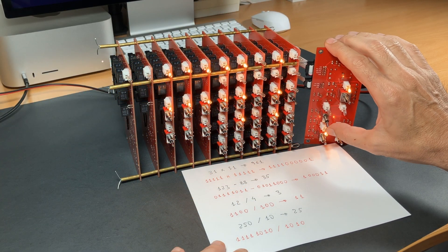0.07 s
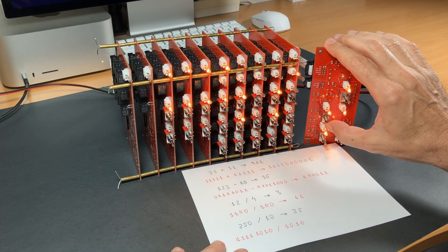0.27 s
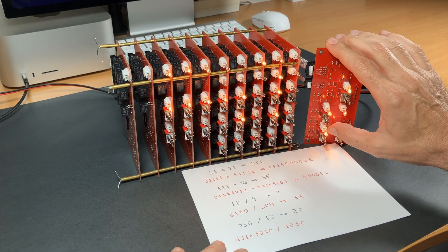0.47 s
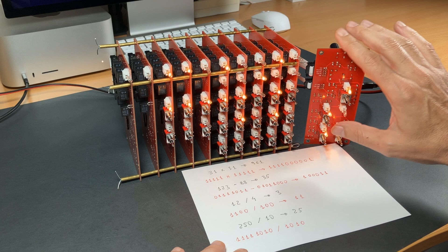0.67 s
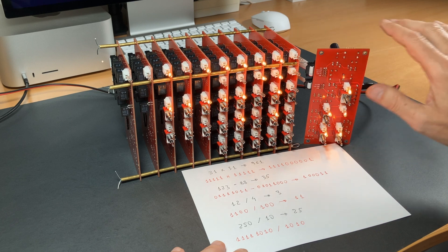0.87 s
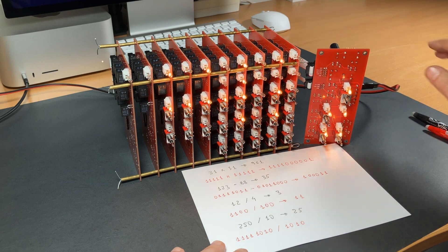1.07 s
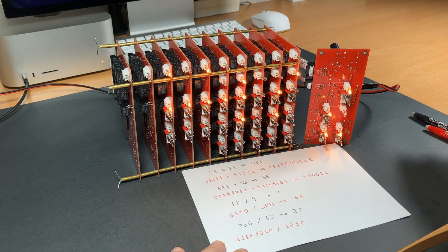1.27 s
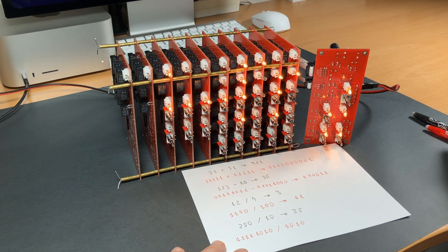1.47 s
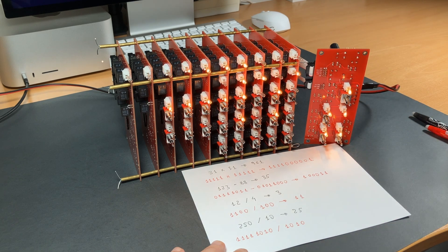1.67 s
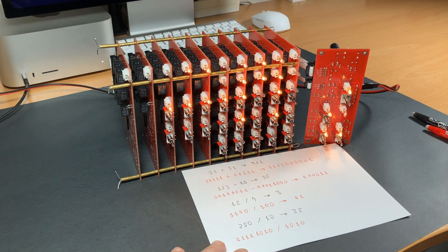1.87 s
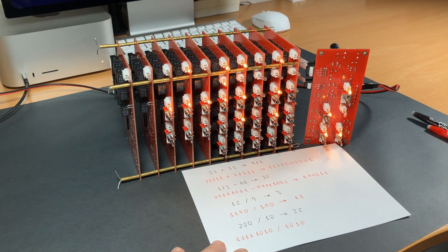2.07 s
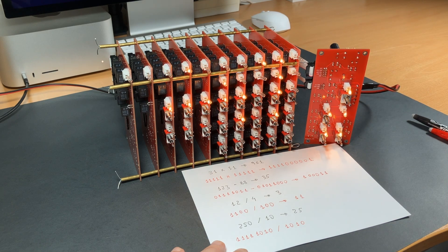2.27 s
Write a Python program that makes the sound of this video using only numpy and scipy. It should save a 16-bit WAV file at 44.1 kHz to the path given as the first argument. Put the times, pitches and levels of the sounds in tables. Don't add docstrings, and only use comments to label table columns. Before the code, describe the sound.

Relays clicking in a fast regular train, close up indoors. Only faint low fan hum and hiss until 0.23 s, when a push switch snaps with a small desk bump. From 0.26 s to the end near 2.3 s, bright metallic clacks alternate with duller ones, one about every 0.06 s. Each is a tiny multi-bounce rattle with briefly ringing springs and boards; alternate cycles sound slightly fuller. Short room reverberation.

```python
import sys
import numpy as np
from scipy import signal
from scipy.fft import rfft, irfft
from scipy.io import wavfile
from scipy.ndimage import uniform_filter1d

SR = 44100
rng = np.random.default_rng(int(sys.argv[2]) if len(sys.argv) > 2 else 0)


def dump_mix(stems):
    frames = np.atleast_2d(stems).T
    limited = np.clip(frames, -1, 1)
    pcm = np.round(limited * 32767).astype(np.int16)
    wavfile.write(sys.argv[1], SR, pcm)


def boost(x):
    u = np.asarray(x, float) / 20
    return 10 ** u


N = 102797

# (time [s], level [dB])
FIRST_PULL = (0.2585, -18)
PULLS = [(0.3783, -17), (0.4947, -17), (0.609, -19.5), (0.725, -17.5), (0.84, -16.5), (0.957, -17.5),
         (1.071, -18), (1.1876, -18.5), (1.3024, -16.5), (1.4184, -17.5), (1.5324, -18.5), (1.6494, -16),
         (1.7648, -17.5), (1.8808, -16.5), (1.9956, -15.5), (2.1104, -18), (2.2267, -18)]
# (frequency [Hz], level [dB])
PULL_TONE = [(290, 17), (500, -23.5), (1200, -2.5), (3400, -9), (3820, -5.5), (6380, 3), (8060, -4),
             (15100, 4.5), (16500, -31.5)]
DROP_TONE = [(290, 15), (500, -33), (1310, -3), (3400, -18.5), (3770, -12.5), (5430, -0.5), (8670, -11),
             (15100, -1.5), (16500, -40)]
# (frequency [Hz], rise [s], time to fall 60 dB [s])
CRACK = [(470, 0.0039, 0.04), (1400, 0.0021, 0.09), (3240, 0.0014, 0.081), (5560, 0.0013, 0.057),
         (11900, 0.0001, 0.035), (16000, 0.0009, 0.0083)]
# (frequency [Hz], level at pull [dB], level at drop [dB], time to fall 60 dB [s])
RINGS = [(1298, -25, -22.5, 0.1), (1355, -28.5, -20.5, 0.089), (1407.5, -29, -20, 0.059),
         (1526, -24, -27, 0.16), (1958, -32, -32, .1), (2845, -29.5, -24, 0.18), (2900, -29, -20.5, 0.091),
         (3385, -31, -22.5, 0.11), (5390, -31, -17.5, 0.038), (5293, -20, -19.5, 0.029),
         (5790, -22, -31, 0.031), (6920, -25, -35, 0.044), (11220, -23, -14.5, 0.019),
         (15396, -5, -21, .012)]


def read(points, hz, column=1):
    table = np.array(points)
    return np.interp(np.log(hz + 1), np.log(table[:, 0] + 1), table[:, column])


def evened(x):
    return x / np.sqrt(np.mean(x ** 2, axis=-1, keepdims=True) + 1e-20)


def add(mix, s, sound):
    part = mix[max(round(s * SR), 0):][:len(sound)]
    part += sound[:len(part)]


def dying(noise, shape, size):
    hz = np.fft.rfftfreq(size, 1 / SR)
    t = np.arange(size) / SR
    spectrum = rfft(noise)
    centres = np.array(shape)[:, 0]
    out = 0
    for k, (_, rise, t60) in enumerate(shape):
        share = read(np.c_[centres, np.eye(len(shape))[k]], hz)
        out = out + irfft(spectrum * share) * (1 - np.exp(-t / abs(rise))) * boost(-60 * t / t60)
    return out


def ringing(modes):
    detune, rise_cycles = 0.0036, 2
    t = np.arange(10240) / SR
    hz, db, t60 = np.array(modes).T[:, :, None]
    hz = hz * (1 + detune * rng.standard_normal(hz.shape))
    envelope = boost(db - 60 * t / t60) * (1 - np.exp(-t * hz / rise_cycles))
    return (envelope * np.sin(2 * np.pi * hz * t)).sum(0)


def rattle(events, blows, tone, shape, crack_db, modes):
    size, span = 4096, 2048
    fresh = 0.7
    jitter_s, spread_db = 0.00015, 1.2
    tilt_hz, flat_hz = 5350, 15070
    tick, tick_s = 2.16, 0.00047
    ring_tilt = 1.48
    lead_s = 0.01

    out = np.zeros(N)
    hz = np.fft.rfftfreq(size, 1 / SR)
    own = rng.standard_normal((len(blows), size))
    tilt_db = np.array(blows)[:, 2:] * np.log2(np.maximum(hz, 900) / tilt_hz)
    tone_gain = boost(read(tone, np.minimum(hz, flat_hz)))
    front = 1 + tick * np.exp(-np.arange(size) / SR / tick_s)
    for s, level_db in events:
        noise = np.sqrt(1 - fresh ** 2) * own + fresh * rng.standard_normal(own.shape)
        coloured = evened(irfft(rfft(noise) * tone_gain))
        cracks = dying(irfft(rfft(coloured) * boost(tilt_db)), shape, size) * front
        train = np.zeros(span)
        chances = rng.standard_normal((len(blows), 2))
        for (delay, db, tilt), crack, (late, more) in zip(blows, cracks, chances):
            gain = boost(level_db + db + spread_db * more)
            add(out, s + delay + jitter_s * late, gain * boost(crack_db) * crack)
            add(train, lead_s + delay, np.array([gain * boost(-ring_tilt * tilt)]))
        add(out, s - lead_s, signal.oaconvolve(train, ringing(modes)))
    return out


def air():
    # (frequency [Hz], level [dB])
    air_tone = [(28, -21), (60, -3), (95, -3.5), (220, -10.5), (420, -18.5), (1400, -31), (3000, -24.5),
                (16000, -32)]
    # (frequency [Hz], width [Hz], level [dB])
    hum = [
        (155.7, 11, -74.5),
        (203.2, 9.5, -70),
    ]
    hz = np.fft.rfftfreq(2 * N, 1 / SR)
    rumble = irfft(rfft(rng.standard_normal(2 * N)) * boost(read(air_tone, hz)))
    out = boost(-63) * evened(rumble)
    for tone_hz, width, db in hum:
        band = np.exp(-((hz - tone_hz) / width) ** 2)
        out = out + boost(db) * evened(irfft(rfft(rng.standard_normal(2 * N)) * band))
    return out[:N]


def switch():
    # (delay [s], level [dB], tilt [dB per octave])
    snap_blows = [
        (-.002, -22, -2),
        (-.0003, -7, 4),
        (.001, 3, -1),
        (.0045, -7.5, 2.3),
        (.008, -11.5, -2.5),
        (0.013, -15, -6),
    ]
    # (frequency [Hz], level [dB])
    snap_tone = [(88, -48), (150, -19), (343, -17.5), (783, -1.5), (1070, -9.5), (1500, -7), (3700, -11.5),
                 (14700, -6.5), (16500, -30)]
    # (frequency [Hz], rise [s], time to fall 60 dB [s])
    snap_crack = [(303, 0.0085, 0.077), (800, 0.0009, 0.065), (2960, 0.00029, 0.025), (16000, 0.0004, .03)]
    # (frequency [Hz], level [dB], time to fall 60 dB [s])
    board = [(480, -1, .05), (570, -3.5, 0.063), (630, -2, 0.045), (790, -6, .06), (830, -10, 0.045),
             (945, -1, 0.087), (1018, 1, 0.067), (1900, -17, .03), (2346, 5, .025), (2940, 0, 0.039),
             (5170, -19, 0.013)]
    desk = [(75, -36.5, 0.13), (127, -35.5, 0.11)]
    snap_s, board_db, desk_delay_s = 0.231, -34, 0.0169
    modes = [(hz, db + board_db, t60) for hz, db, t60 in board]
    out = rattle([(snap_s, 0)], snap_blows, snap_tone, snap_crack, -20.5, modes)
    add(out, snap_s + desk_delay_s, ringing(desk))
    return out


def room(x):
    # (frequency [Hz], time to fall 60 dB [s])
    fade_times = [(500, 0.39), (2000, 0.61), (6000, 0.43), (15000, 0.34)]
    gap, length, count = 16, 24576, 3
    turn_s = 0.221
    shape = [(hz, 0.006, t60) for hz, t60 in fade_times]
    echoes = length // gap
    out = 0
    for k in range(count):
        taps = np.zeros(length)
        signs = rng.choice([-1., 1.], echoes)
        places = np.arange(0, length, gap) + rng.integers(0, gap, echoes)
        taps[places] = signs
        tail = dying(taps, shape, length)
        phase = np.pi * (np.arange(N) / SR / turn_s / count + k / count)
        turn = np.sqrt(2 / count) * np.cos(phase)
        out = out + signal.oaconvolve(x * turn, tail / np.linalg.norm(tail))[:N]
    return out


def pull_in():
    # (delay [s], level [dB], tilt [dB per octave])
    pull_blows = [
        (-.002, -14.5, -1),
        (.001, 0, 2),
        (.003, -6.5, 0.7),
        (.006, -7, -0.7),
        (.011, -8, -0.5),
        (0.016, -18, -4),
    ]
    modes = np.array(RINGS)[:, [0, 1, 3]]
    return rattle([FIRST_PULL] + list(PULLS), pull_blows, PULL_TONE, CRACK, -3, modes)


def counter():
    # (delay [s], level [dB], tilt [dB per octave])
    stage_blows = [
        (0.001, -0.5, -3.2),
        (.002, -1, 0),
        (.005, -7.5, -1),
    ]
    # (frequency [Hz], level [dB], time to fall 60 dB [s])
    panels = [(814, -9.5, 0.12), (884, -0.5, 0.058), (920, -1.5, 0.029), (1014, 3.5, 0.017),
              (1091, -4, 0.14), (1198, -1, 0.063), (1722, 1.5, 0.089), (2022, -4, 0.037)]
    delay_s, pull_db, second_db, fourth_db = 0.009, -27.5, -53, -52.5

    def strokes(first, step, db):
        return [(s + delay_s, db) for s, _ in PULLS[first::step]]

    pulls = [(FIRST_PULL[0] + delay_s, pull_db)] + strokes(1, 2, pull_db)
    drops = strokes(0, 2, second_db) + strokes(2, 4, fourth_db)
    soft_panels = [(hz, db - 39.5, t60) for hz, db, t60 in panels]
    pulling = rattle(pulls, stage_blows, PULL_TONE, CRACK, -3, soft_panels)
    dropping = rattle(drops, stage_blows, DROP_TONE, CRACK, 26, panels)
    return pulling + dropping


def drop_out():
    # (time [s], level [dB])
    drops = [(0.3266, -17.5), (0.4443, -17), (0.5581, -19), (0.6741, -18), (0.7902, -17.5), (0.9041, -18),
             (1.0199, -18), (1.1351, -17.5), (1.2526, -18.5), (1.3672, -17.5), (1.482, -19),
             (1.5985, -16.5), (1.7139, -17), (1.8299, -19), (1.9451, -17.5), (2.0601, -18.5), (2.1752, -18),
             (2.2908, -16)]
    # (delay [s], level [dB], tilt [dB per octave])
    drop_blows = [
        (-.0005, -20, 4),
        (.001, -6.5, 2.25),
        (.003, -6, 0),
        (.006, -8.5, -2.4),
        (0.01, -16, -4),
    ]
    modes = np.array(RINGS)[:, [0, 2, 3]]
    return rattle(drops, drop_blows, DROP_TONE, CRACK, -2.5, modes)


def rack():
    high_pass = signal.butter(4, 720, "high", fs=SR, output="sos")
    return signal.sosfilt(high_pass, pull_in() + counter() + drop_out())


def scene():
    near = rack() + switch()
    return (near + boost(-6) * room(near) + air())[None]


def top_cut(x):
    return signal.sosfilt(signal.butter(12, 16810, fs=SR, output="sos"), x)


def record(dry):
    edge_hz, top_hz = 15780, 16650
    top_db, gate_db = -9, -27
    hz = np.fft.rfftfreq(2 * N, 1 / SR)
    spectrum = rfft(dry, 2 * N)
    low = irfft(spectrum * (hz < edge_hz))[:, :N]
    top = irfft(spectrum * (hz >= edge_hz) * (hz < top_hz))[:, :N]
    power_db = 10 * np.log10(abs(uniform_filter1d(dry ** 2, size=256)) + 1e-12)
    opening = 1 / (1 + boost(9.2 * (gate_db - power_db)))
    gate = uniform_filter1d(opening, size=128)
    return top_cut(low + boost(top_db) * gate * top)


dry = scene()
out = record(dry)
dump_mix(out)
```